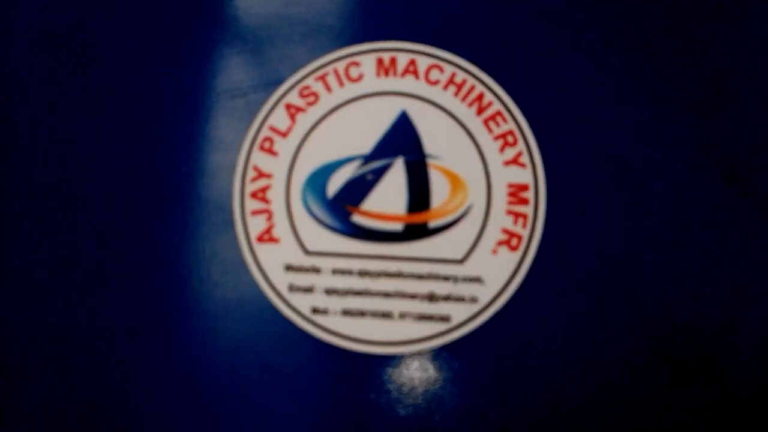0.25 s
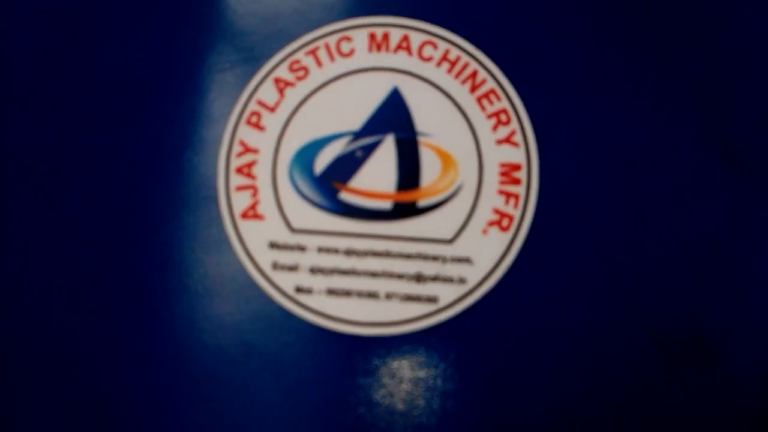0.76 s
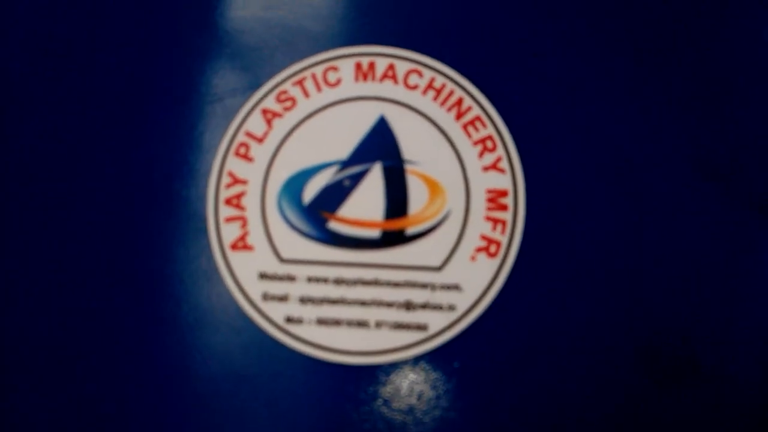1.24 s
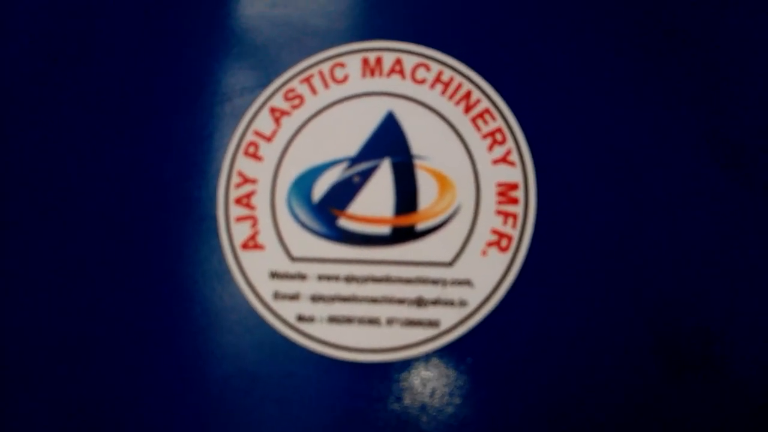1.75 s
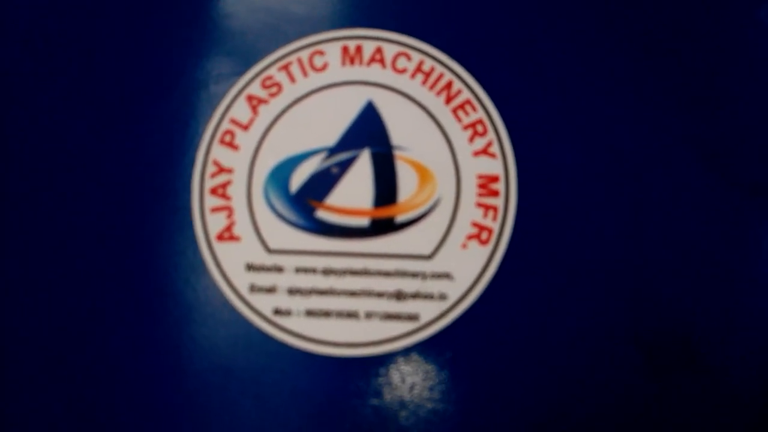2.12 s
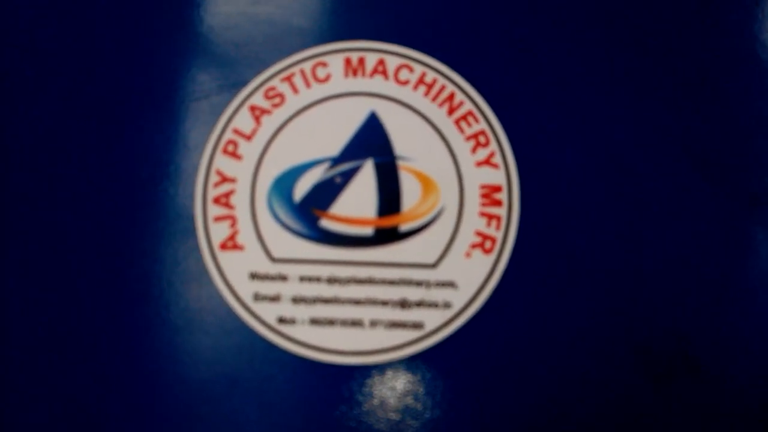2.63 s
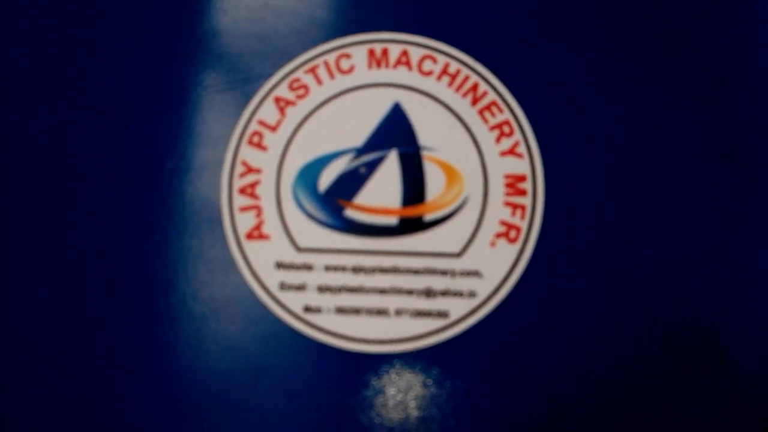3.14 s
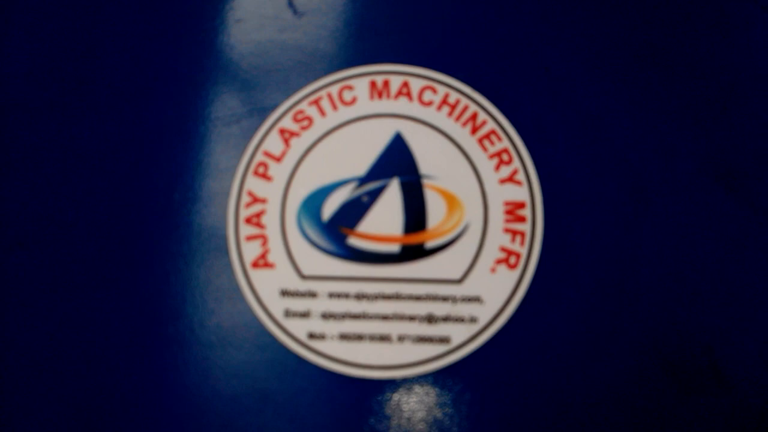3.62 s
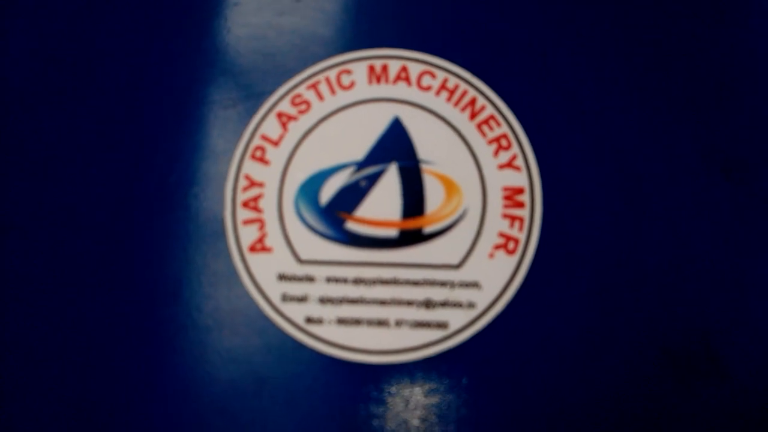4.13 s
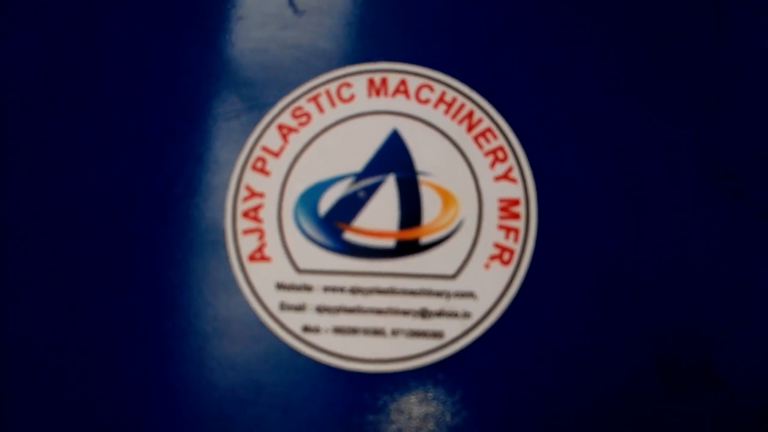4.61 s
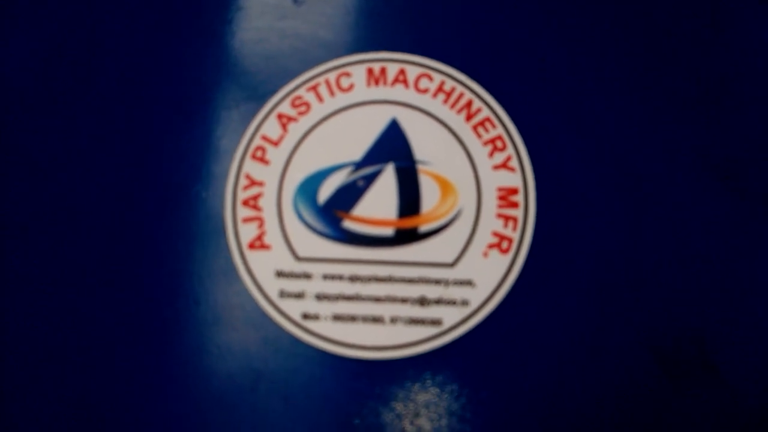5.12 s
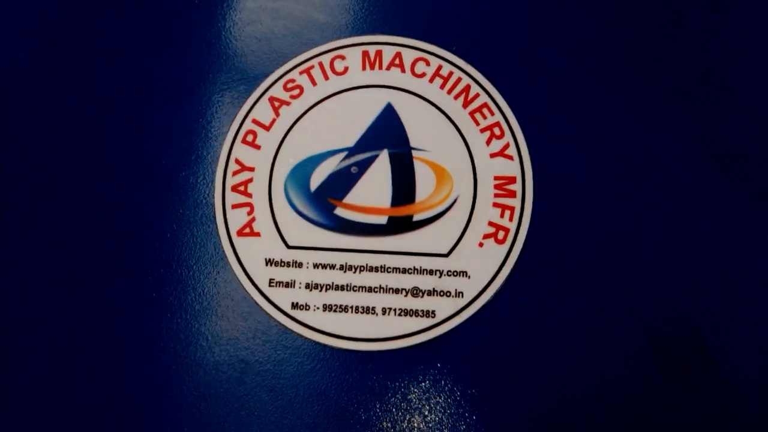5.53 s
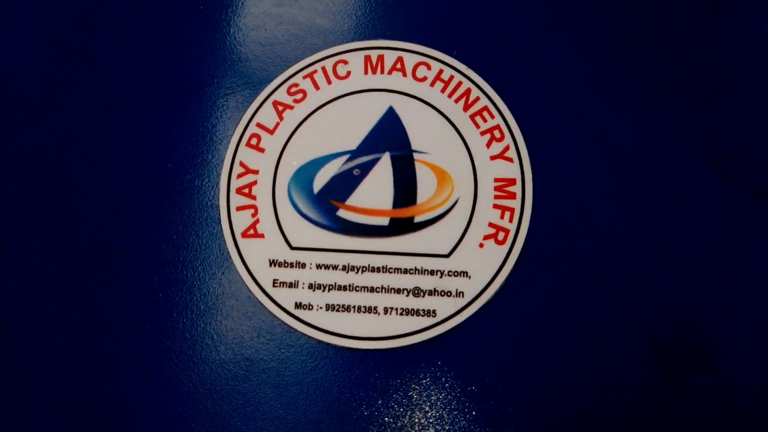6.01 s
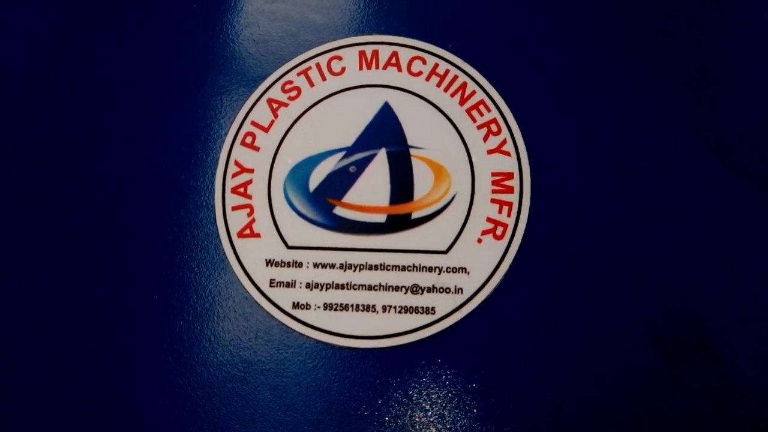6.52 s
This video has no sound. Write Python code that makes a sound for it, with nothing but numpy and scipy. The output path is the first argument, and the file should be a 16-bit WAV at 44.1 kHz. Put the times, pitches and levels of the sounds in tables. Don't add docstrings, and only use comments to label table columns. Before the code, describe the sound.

Steady plastic-film machinery drones and pulses close by, air rushing through ducts and drives singing shrilly, after the booming tail of one loud bang.

```python
import sys
import numpy as np
from scipy import signal
from scipy.fft import rfft, irfft
from scipy.io import wavfile
from scipy.ndimage import uniform_filter1d

SR = 44100
rng = np.random.default_rng(int(sys.argv[2]) if len(sys.argv) > 2 else 0)


def wrap_up_sound(samples):
    columns = np.atleast_2d(samples).T
    tamed = np.clip(columns, -1, 1)
    steps = np.round(tamed * 32767).astype(np.int16)
    wavfile.write(sys.argv[1], SR, steps)


def to_linear_factor(level_db):
    exponent = np.asarray(level_db, float) / 20
    return 10 ** exponent


N = 298116
T = np.arange(N) / SR
SLOW_MOTOR_HZ, FAST_MOTOR_HZ, MAINS_HZ = 48.63, 48.977, 49.982
BLOWER_HZ = 69.4


def read(points, hz):
    f, value = np.transpose(points)
    return np.interp(np.log(hz + 1), np.log(f + 1), value)


def drift(rate_hz, count):
    f = np.geomspace(.1, rate_hz, num=16)
    phase = 2 * np.pi * rng.random((count, 16, 1))
    knots = np.arange(0, N + 512, 512) / SR
    waves = np.sin(2 * np.pi * f[:, None] * knots + phase) / np.sqrt(f[:, None])
    return [np.interp(T, knots, c / c.std()) for c in waves.sum(1)]


# f/Hz, correlation
LIKENESS = [(30, 1.1), (60, 1.05), (94, 1), (150, 0.94), (230, 1.01), (360, 0.97), (560, 0.98), (870, 0.81),
            (1350, 0.88), (1700, 0.62), (2600, 0.73), (3700, 0.63), (4300, 0.29), (5150, 0.22),
            (6500, 0.64), (8030, 0.69)]
# f/Hz, level/dB
LEAN = [(30, -2), (60, 0.8), (94, 0.4), (150, 2), (230, 1), (360, 1), (560, 3.5), (870, 1.5), (1350, 3),
        (2110, 0), (3300, 7.5), (5150, 7.5), (8030, 5)]
# f/Hz, phase/rad
LEAD = [(60, .09), (230, -.05), (560, -.15), (1350, -.4), (2100, .1), (3700, .5), (4700, 2.3), (5800, 2.7),
        (7300, 3.1)]


def noise(db_per_hz, size, patchy_db=0.):
    hop = size // 4
    frames = N // hop + 5
    hz = np.fft.rfftfreq(size, 1 / SR)[:, None]
    a, b, c, d, patches = rng.standard_normal((frames, len(hz), 5)).T
    patches = uniform_filter1d(patches, size=30, axis=0)
    patches = uniform_filter1d(patches, size=5, axis=1)
    same = np.clip(read(LIKENESS, hz), -1, 1)
    left = a + 1j * b
    shared = same * left * np.exp(-1j * read(LEAD, hz))
    own = np.sqrt(1 - same ** 2) * (c + 1j * d)
    right = (shared + own) / to_linear_factor(read(LEAN, hz))
    s = np.arange(frames) * hop / SR
    shape = to_linear_factor(db_per_hz(hz, s) + patchy_db * patches / patches.std())
    scale = np.sqrt(3 * SR / (2 * size))
    ports = np.array([left, right]) * shape
    return scale * signal.istft(ports, nperseg=size, noverlap=size - hop)[1][:, :N]


def thin_lines(table, waver_db, swing_rad):
    out, wander = np.zeros((2, N)), drift(6., count=8)
    waver = to_linear_factor(waver_db * np.array(wander))
    for k, (hz, db, lean_db, lead) in enumerate(table):
        turn = 2 * np.pi * (hz * T + rng.random()) + swing_rad * wander[k % 8]
        out[0] += to_linear_factor(db) * waver[(k + 2) % 8] * np.cos(turn + lead)
        right_turn = turn + 0.33 * wander[(k + 3) % 8]
        out[1] += to_linear_factor(db - lean_db) * waver[(k + 5) % 8] * np.cos(right_turn)
    return np.sqrt(2) * out


def swept(s, hz, db):
    hz = np.interp(T, s, hz * np.ones(len(s)))
    tone = np.sqrt(2) * to_linear_factor(np.interp(T, s, db)) * np.cos(2 * np.pi * np.cumsum(hz) / SR)
    lean = to_linear_factor(read(LEAN, hz.mean()) / 2)
    return tone * np.array([[lean], [1 / lean]])


def swells(rows, rest_db):
    knots = T[::128]
    power = sum(to_linear_factor(2 * db) * np.exp(-4 * ((knots - s) / length) ** 2) for s, db, length in rows)
    return np.interp(T, knots, 10 * np.log10(power + to_linear_factor(2 * rest_db)))


def chirps(rows, hz, shake_hz):
    knots = np.arange(0, N / SR, .02)
    level_db = np.interp(knots, T, swells(rows, -90))
    return swept(knots, hz + shake_hz * rng.standard_normal(len(knots)), level_db)


def throb(rows, rest_db, hz, shake):
    knots = np.arange(0, N / SR, .025)
    pitch_hz = hz * (1 + shake * rng.standard_normal(len(knots)))
    level_db = np.interp(knots, T, swells(rows, rest_db))
    return to_linear_factor(-1.3) * swept(knots, pitch_hz, level_db)


# f/Hz, density at start/dB per Hz, t60/s
BANG = [(45, -88, 1.2), (85, -53, 3.6), (129, -47, 1.8), (227, -46.5, 1.7), (320, -57, 0.97),
        (450, -53.5, 1.3), (700, -66, 1.9), (1800, -71.5, 1.9), (3800, -69, 1.8), (6460, -75, 3.7),
        (8400, -100, .8)]


def bang():
    hz_db = [row[:2] for row in BANG]
    hz_t60 = [row[::2] for row in BANG]
    return noise(lambda hz, s: read(hz_db, hz) - 60 * s / read(hz_t60, hz), size=1024, patchy_db=1.2)


# t/s, peak level/dB, f/Hz, t60/s
THUMPS = [
    (-.0008, -17.5, 98, 0.18),
    (1.835, -23, 100, 0.12),
    (4.243, -19.5, 85, 0.1),
    (4.344, -22, 97, 0.18),
]


def thumps():
    out = np.zeros(N)
    for s, db, hz, t60 in THUMPS:
        age = np.maximum(T - s, 0)
        out += to_linear_factor(db - 60 * age / t60) * np.sin(2 * np.pi * hz * age)
    return out


# order, slow motor level/dB, fast motor level/dB, t first in step/s
MOTOR_ORDERS = [(1, -54, -57, 1.382), (2, -41, -40, .51), (3, -44, -51, .851), (6, -52, -79, .373),
                (10, -58, -55, .075), (12, -66, -74, .186), (13, -64, -89, .043), (20, -70, -71, .141),
                (22, -93, -74, .084)]
CASING_ORDERS = [(8, -61, -56, .351)]
# mains multiple, level/dB, t first in step with the fast motor/s
IRON_HUM = [(2, -48, .333), (6, -50, .128)]


def motors():
    def tone(hz, db, order, in_step):
        cycles = hz * (T - in_step) + order * FAST_MOTOR_HZ * in_step
        return to_linear_factor(db) * np.sqrt(2) * np.cos(2 * np.pi * cycles)

    def lean(hz):
        return to_linear_factor([[0], [read(LEAN, hz)]])

    out = np.zeros((2, N))
    for order, slow_db, fast_db, in_step in [*MOTOR_ORDERS, *CASING_ORDERS]:
        slow = tone(order * SLOW_MOTOR_HZ, slow_db, order, in_step)
        fast = tone(order * FAST_MOTOR_HZ, fast_db, order, 0)
        out += (slow + fast) / lean(order * FAST_MOTOR_HZ)
    for order, db, in_step in IRON_HUM:
        out += tone(order * MAINS_HZ, db, order, in_step) / lean(order * MAINS_HZ)
    return to_linear_factor(-0.7) * out


# f/Hz, left level/dB, left minus right/dB, left lead/rad
WHINE = [(3242.4, -55.0, 8.0, 1.2), (3418.2, -55.0, 12.0, -1.1), (3486.9, -60.0, 6.0, 2.3),
         (3499.7, -53.0, 6.0, 1.1), (3581.2, -61.0, -0.0, 2.3), (3594.1, -51.0, 12.0, 2.6),
         (3853.6, -59.0, 24.0, 0.3), (3877.5, -48.0, 10.0, 0.3), (3924.1, -59.0, 4.0, 0.5),
         (3947.7, -53.0, 3.0, -0.8), (3958.9, -44.0, 10.0, -0.1), (3994.2, -55.0, 13.0, 0.0),
         (4000.1, -48.0, 4.0, 2.3), (4040.4, -55.0, 8.0, 0.7), (4052.4, -44.0, 14.0, 3.0),
         (4076.1, -54.0, 9.0, 0.1), (4121.8, -53.0, 6.0, 0.9), (4146.7, -57.0, 15.0, 0.1),
         (4406.2, -46.0, 12.0, -2.3), (4418.3, -57.0, 10.0, 0.9), (4499.6, -41.0, 16.0, 1.4),
         (4512.5, -56.0, 4.0, 0.0), (4589.2, -60.0, 9.0, -2.5), (5071.5, -61.0, 16.0, -3.0),
         (5921.8, -64.0, 6.0, 1.2), (6484.6, -60.0, 10.0, 2.9), (7994.3, -65.0, 4.0, -3.1),
         (8000.0, -67.0, 6.0, 3.1), (8005.7, -65.0, 5.0, 3.1)]


def drives():
    return to_linear_factor(-.4) * thin_lines(WHINE, waver_db=1.5, swing_rad=.45)


# f/Hz, left level/dB, left minus right/dB, left lead/rad
GEARS = [(716.2, -62, 5, -.4), (1024, -67, -1, -.3), (1072.6, -69, -8, 0), (1079.5, -66, -1, -.6),
         (2382.7, -66, 12, -.1), (2484.4, -65, 3, -.1), (4378, -62, 9, 2), (4756.9, -64, 7, 1.4),
         (5672.6, -66, 9, -2.8)]


def gears():
    return to_linear_factor(-0.5) * thin_lines(GEARS, waver_db=3.5, swing_rad=.6)


# f/Hz, density/dB per Hz
RUSH = [(25, -84), (45, -75), (70, -59), (120, -57.5), (170, -61.5), (300, -59), (420, -65), (930, -78.5),
        (1200, -76), (1950, -81), (4000, -70.5), (5500, -75.5), (7400, -83), (8100, -92), (8900, -102)]
HUMP_HZ = [69.3, 140, 197, 222, 282, 315, 432, 528, 585, 680, 1110, 1320, 2680, 3710, 3800, 4218, 4260,
           5020, 5065, 5195, 6490, 7330, 1175, 98]
# width/Hz, peak density/dB per Hz
HUMPS = [(2.5, -59), (12, -68), (36.5, -52.5), (32, -57.5), (22.1, -57), (20, -60), (14.9, -64), (9.8, -69),
         (15, -73), (28, -69.5), (39.8, -77), (30, -91), (33, -72), (73, -68.5), (20, -67.5), (60, -61),
         (42, -66.5), (30, -68), (60, -71), (45, -67.5), (50, -73), (120, -92), (50, -74.5), (40, -59.5)]


def blower():
    def density(hz, s):
        humps = 0
        for f, (width, db) in zip(HUMP_HZ, HUMPS):
            humps = humps + to_linear_factor(2 * db) / (1 + (2 * (hz - f) / width) ** 2) ** 2
        return 10 * np.log10(to_linear_factor(2 * read(RUSH, hz)) + humps) + 0 * s
    return noise(density, size=8192, patchy_db=0.31)


# f/Hz, half width/Hz, mean level/dB, depth/dB, t loudest/s
STANDING_BANDS = [(3959, 9, -.8, 2.4, 1.7), (3999, 12, 2, 3, 1.6), (4122, 7, 1, 5, 6.3),
                  (4240, 60, -1.5, 2.2, 4.8), (4500, 9, -1, 2.2, 1.9)]


def standing_waves(x):
    node_to_node_s = 7.
    hz, spectrum, out = np.fft.rfftfreq(N, 1 / SR), rfft(x), x.copy()
    for centre, half, mean_db, depth_db, loudest in STANDING_BANDS:
        band = irfft(spectrum * np.exp(-((hz - centre) / half) ** 4), N)
        gain_db = mean_db + depth_db * np.cos(2 * np.pi * (T - loudest) / node_to_node_s)
        out += (to_linear_factor(gain_db) - 1) * band
    return out


# t/s, f/Hz, level/dB
ROLLER = [(0, 2990, -51), (.7, 2990, -52), (1., 2985, -62), (1.35, 2983, -58), (1.85, 2979, -64),
          (1.92, 2972, -52), (2.85, 2969, -58), (3, 2964, -61), (3.55, 2965, -61), (3.8, 2973, -54),
          (4.3, 2977.5, -58), (5.1, 2975, -54), (5.3, 2967, -60), (5.8, 2966, -64), (5.95, 2957, -64),
          (6.2, 2954, -55), (6.4, 2954, -58), (6.55, 2953, -68), (6.76, 2953, -63)]
# t/s, level/dB
SIDE_LINE = [(0, -55), (.5, -57), (.95, -57), (1.05, -66), (1.25, -59), (1.9, -58), (2, -70), (3.8, -68),
             (4.05, -60), (5, -63), (5.3, -70), (6, -68), (6.2, -59), (6.4, -64), (6.5, -72)]


def roller():
    s, hz, db = np.transpose(ROLLER)
    knots = np.arange(0, N / SR, .02)
    side_hz = np.interp(knots, s, hz) - SLOW_MOTOR_HZ
    side_db = np.interp(knots, *np.transpose(SIDE_LINE))
    return to_linear_factor(1.0) * swept(s, hz, db) + swept(knots, side_hz, side_db)


# t/s, level/dB, length/s
BEARING = [(.03, -52, .1), (.22, -48, 0.044), (.87, -53, .08), (1.13, -49, 0.044), (1.36, -51.5, 0.079),
           (1.6, -51.5, 0.08), (1.77, -51, 0.038), (2.52, -56, 0.061), (2.73, -50, .04), (2.96, -52, .04),
           (3.18, -52, .05), (3.37, -48.5, 0.045), (3.42, -49, .03), (3.73, -52, .06), (3.9, -54, .04),
           (4.1, -56, .07), (4.79, -50.5, 0.036), (4.85, -56, .03), (4.92, -52, .04), (5.07, -50.5, 0.074),
           (5.25, -54, .04), (5.31, -50, 0.044), (5.55, -57, .06), (5.72, -56, .05), (6.17, -50, 0.071),
           (6.27, -50, 0.051), (6.4, -60, .05), (6.62, -57, 0.042)]


def bearing():
    return to_linear_factor(1.) * chirps(BEARING, 1175, shake_hz=14)


# t/s, level/dB, length/s, shaft order
SURGES = [(0.2, -42, 0.45, 2), (1.2, -37, 0.65, 2), (2.105, -36, 0.64, 2), (3.55, -36.5, 0.29, 2),
          (4.05, -37, 0.62, 2), (4.527, -33, 0.23, 2), (6.246, -36, 0.2, 2), (0.082, -37, 0.09, 4),
          (.5, -38, .15, 4), (0.733, -39.5, 0.054, 4), (0.958, -33, 0.052, 4), (1.55, -39, .2, 4),
          (1.88, -33.5, 0.11, 4), (2.157, -34.5, 0.12, 4), (2.503, -39, 0.074, 4), (2.8, -42, .1, 4),
          (3.133, -35.5, 0.094, 4), (3.34, -33, 0.12, 4), (3.62, -36.5, 0.17, 4), (4.003, -36, 0.12, 4),
          (4.246, -34, 0.12, 4), (4.65, -38, 0.16, 4), (5.1, -38, .1, 4), (5.55, -43, 0.087, 4),
          (5.794, -34, 0.074, 4), (6.04, -38, 0.11, 4), (6.297, -37, 0.074, 4)]


def shaft_surges():
    out = np.zeros((2, N))
    for order, shake in ((2, .025), (4, .015)):
        rows = [row[:3] for row in SURGES if round(row[3]) == order]
        out += throb(rows, -48, order * BLOWER_HZ, shake)
    return out


# t/s, level/dB, length/s
SQUEAK_HIGH = [(.1, -51, .2), (.62, -57, .1), (1.2, -61, 0.24), (3.2, -61, .15), (4.68, -43, .08),
               (4.94, -50, .08), (5.2, -47.5, .1), (5.7, -56, 0.23), (6., -48, .1), (6.35, -50, .25),
               (6.7, -55.5, 0.11)]
# t/s, level/dB, length/s
SQUEAK_LOW = [
    (1.4, -65, .15),
    (3.4, -59, 0.25),
    (4.1, -58.5, .3),
    (4.58, -44, .12),
    (4.9, -50, .12),
    (5.3, -57, .1),
]


def film():
    return chirps(SQUEAK_HIGH, 4262, shake_hz=8) + chirps(SQUEAK_LOW, 4229, shake_hz=8)


# t/s, level/dB, length/s
SHIVERS = [
    (.1, -53, 0.13),
    (.45, -42.5, .25),
    (1.15, -41, 0.43),
    (1.65, -43, 0.21),
    (2.9, -40, 0.39),
    (3.9, -43, 0.55),
    (4.7, -43, 0.26),
    (5.35, -43.5, 0.22),
    (6.3, -49, 0.64),
]


def panel():
    return throb(SHIVERS, -62.5, 391, shake=.008)


# t/s, level/dB, length/s
BOOM = [(.13, -32, 0.058), (.24, -31, 0.092), (.35, -30, 0.077), (.54, -29, 0.098), (.76, -31.5, 0.094),
        (.86, -23.5, 0.026), (1.05, -33, 0.11), (1.33, -29.5, 0.11), (1.53, -29, 0.088),
        (1.68, -32.5, 0.11), (1.85, -32, 0.15), (2.08, -31.5, 0.083), (2.31, -27, 0.14), (2.52, -34, 0.34),
        (2.86, -29, 0.071), (3.05, -32.5, 0.12), (3.24, -37, 0.19), (3.54, -29.5, 0.055),
        (3.77, -28, 0.086), (4.03, -33, 0.092), (4.24, -34, .1), (4.37, -25, 0.073), (4.62, -36.5, 0.19),
        (4.97, -28, 0.14), (5.12, -33, 0.2), (5.33, -29.5, 0.13), (5.55, -26, 0.084), (5.77, -33.5, 0.12),
        (6.04, -31, 0.23), (5.86, -39, .06), (6.29, -27, 0.062), (6.52, -29.5, 0.1), (6.72, -30.5, 0.11)]


def casing():
    return throb(BOOM, -44.5, 195.8, shake=.009)


# t/s, level/dB, centre f/Hz, width/octaves, t60/s
KNOCKS = [
    (.13, -46, 5950, 0.81, 0.74),
    (.42, -40, 6200, 0.41, 0.36),
    (1.36, -45, 1380, 0.75, 0.67),
    (6.255, -44, 1800, 1.3, 0.18),
    (6.44, -47, 1500, 1.4, 0.25),
]


def knocks():
    rise_s = 0.0069
    out, hz = np.zeros((2, N)), np.fft.rfftfreq(N, 1 / SR)
    echo = rfft(noise(lambda hz, s: 0 * hz + 0 * s, size=1024))
    for s, db, centre_hz, octaves, t60 in KNOCKS:
        off_centre = np.log2((hz + 1) / centre_hz) / octaves
        band = irfft(echo * np.exp(-2 * off_centre ** 2), N)
        age = np.maximum(T - s, 0)
        out += to_linear_factor(db - 60 * age / t60) * (1 - np.exp(-age / rise_s)) * band / band[0].std()
    return out


# t/s, level/dB, length/s
FLUTTERS = [(.3, -41, .1), (1.1, -47, 0.19), (2.1, -40, 0.076), (2.45, -37, 0.11), (2.7, -40.5, 0.11),
            (3.33, -39, 0.068), (3.63, -36, 0.12), (4.15, -40.5, 0.19), (4.6, -44.5, .1),
            (5.9, -40.5, 0.069), (6.6, -41.5, 0.18)]


def duct_wall():
    return to_linear_factor(1.) * chirps(FLUTTERS, 316, shake_hz=6)


# t/s, level/dB, length/s
LEAK = [(.43, -60, .1), (1.08, -55, .1), (2.62, -56, .2), (3.55, -58, 0.18), (3.97, -53, .08),
        (4.67, -60, .12), (5.08, -55, .06), (5.3, -54, .2), (5.55, -56, .08), (5.82, -51, 0.1),
        (6.3, -57, 0.065), (6.58, -53, 0.11)]


def leak():
    return to_linear_factor(1.) * chirps(LEAK, 5066, shake_hz=15)


# t peak/s, level/dB
CLATTER = [
    (6.09, -40),
    (6.14, -36.5),
    (6.25, -36),
    (6.34, -39),
    (6.42, -37.5),
]
# f/Hz, density/dB per Hz
CLATTER_COLOUR = [(200, -30), (450, 5), (900, -10.5), (2200, -8), (3500, -6), (7000, -22), (8500, -48)]


def clatter():
    rise_s, t60_s = 0.027, 0.88
    power = np.zeros(N)
    for s, db in CLATTER:
        age = np.maximum(T - s + rise_s, 0)
        power += (to_linear_factor(db - 60 * age / t60_s) * np.minimum(age / rise_s, 1)) ** 2
    rustle = noise(lambda hz, s: read(CLATTER_COLOUR, hz) + 0 * s, size=1024, patchy_db=1.5)
    return np.sqrt(power) * rustle / rustle[0].std()


def scene():
    steady = standing_waves(drives() + gears() + blower())
    blows = bang() + thumps() + knocks() + clatter()
    low_throbs = shaft_surges() + panel() + casing()
    notes = bearing() + film() + duct_wall() + leak()
    return motors() + steady + roller() + low_throbs + notes + blows


def ragged_top(x):
    mid_side = np.array([x[0] + x[1], x[0] - x[1]]) / 2
    hz, s, z = signal.stft(mid_side, SR, nperseg=1024, noverlap=896)
    luck = rng.random((len(s) // 16 + 1, 3))
    luck = luck[np.arange(len(s)) // 16].T
    sum_edge_hz = 8000 + 270 * luck[0] + 480 * (luck[1] < .17)
    difference_edge_hz = 8640 + 170 * luck[2]
    z *= hz[:, None] < np.array([sum_edge_hz, difference_edge_hz])[:, None]
    both, apart = signal.istft(z, SR, nperseg=1024, noverlap=896)[1][:, :N]
    return np.array([both + apart, both - apart])


def low_pass(x):
    return signal.sosfilt(signal.butter(12, 8850, fs=SR, output="sos"), x)


def record(dry):
    bass_cut = signal.butter(3, 36, "highpass", fs=SR, output="sos")
    heard = signal.sosfilt(bass_cut, dry)
    mix = ragged_top(heard) - .0008
    return low_pass(mix)


dry = scene()
out = record(dry)
wrap_up_sound(out)
```